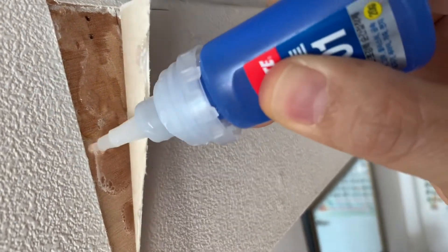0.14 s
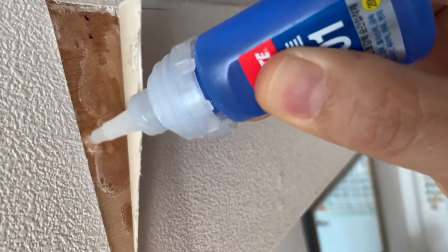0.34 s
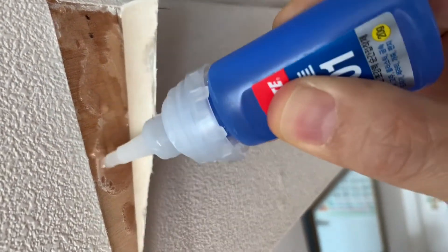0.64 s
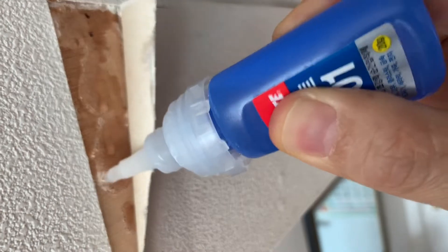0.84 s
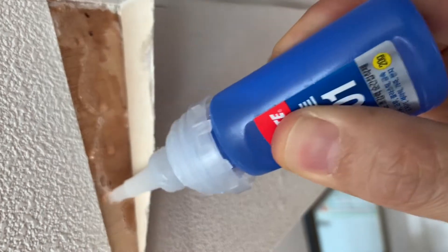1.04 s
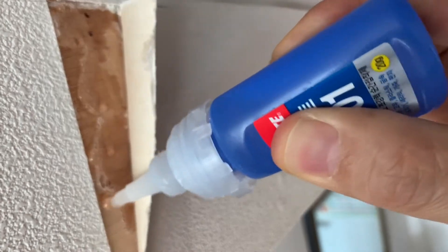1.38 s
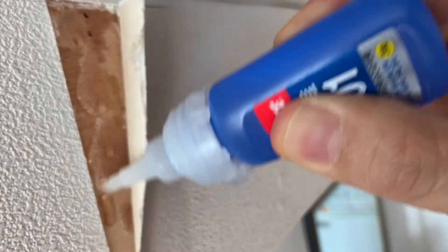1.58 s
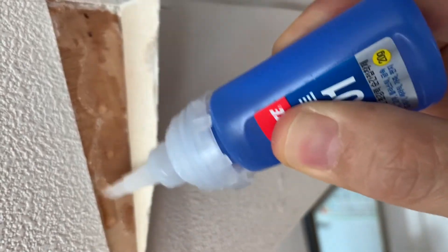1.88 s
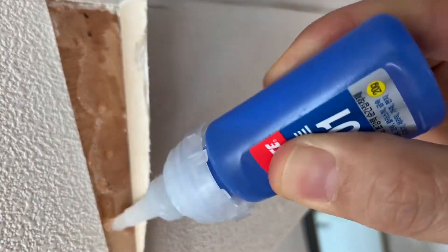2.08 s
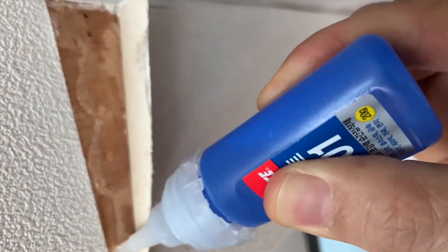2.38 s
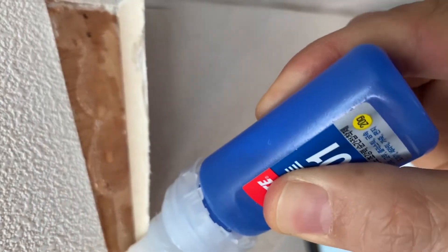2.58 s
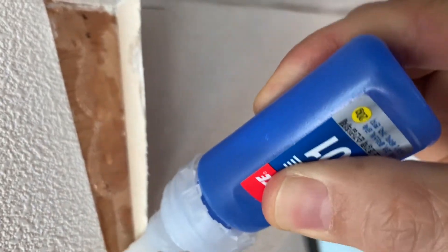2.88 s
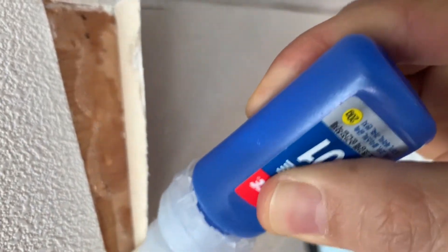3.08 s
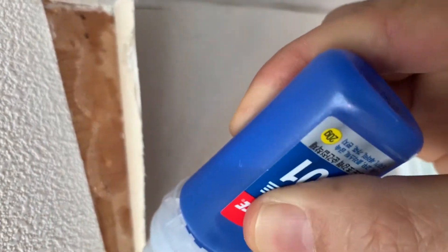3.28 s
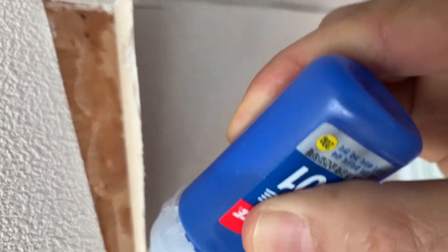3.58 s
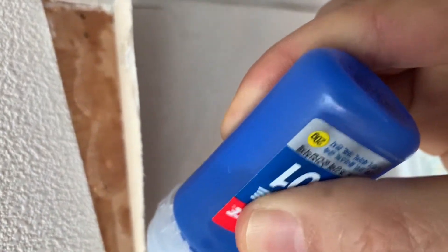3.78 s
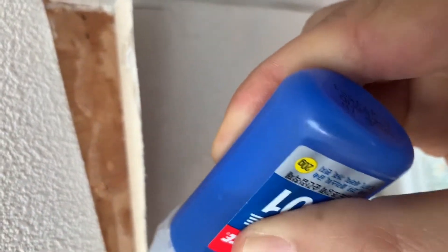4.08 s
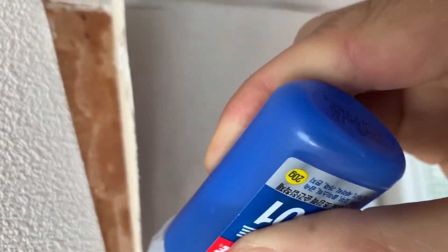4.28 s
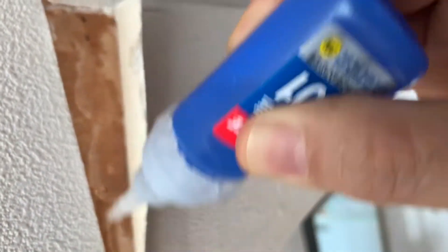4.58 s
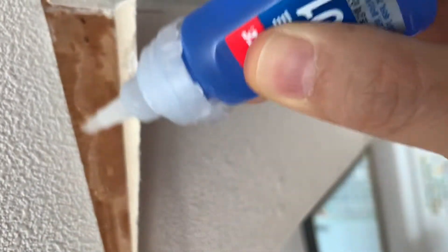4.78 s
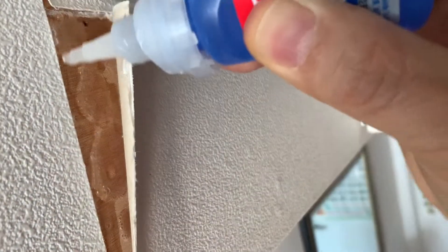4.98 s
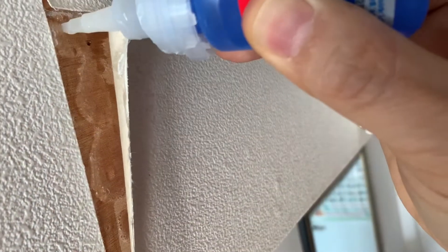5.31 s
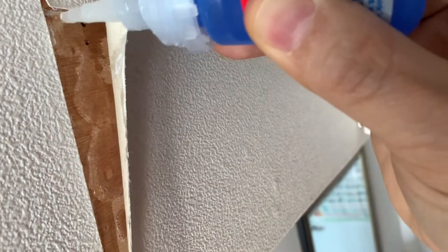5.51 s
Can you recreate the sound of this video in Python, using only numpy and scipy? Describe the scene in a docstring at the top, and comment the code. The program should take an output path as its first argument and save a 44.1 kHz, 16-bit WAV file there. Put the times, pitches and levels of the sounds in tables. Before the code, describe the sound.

A plastic glue bottle nozzle dabs along the edge of a papered wall panel, close to the microphone in a quiet room. For about four seconds it makes short, hissy scratches, many ending in a soft hollow knock, some with a brief judder or low rubbing hum. Then one longer, louder drag scrapes along the panel and brushes a loose paper edge. A few faint knocks follow, over a low handling rumble.

```python
"""A plastic glue nozzle works along the bare edge of a papered wall panel in a quiet room.
For four seconds it dabs in short, hissing strokes; about a third end in a knock, and some judder or hum.
Then comes one long drag back, which brushes a loose paper edge near 5 s, and last a few soft knocks.
Knocks and drag travel through the panel as bending waves, treble first, and reach the left microphone
first; the hiss travels through the air and reaches the right one first."""
import sys
import numpy as np
from scipy import signal
from scipy.fft import rfft, irfft, next_fast_len
from scipy.io import wavfile

SR = 44100
rng = np.random.default_rng(int(sys.argv[2]) if len(sys.argv) > 2 else 0)


def materialize(psi):
    """Save the field psi as 16-bit PCM at rate SR to the path in sys.argv[1].

    A 1-D psi becomes a single channel; in a 2-D psi each row is a channel.
    """
    bounded = np.clip(np.atleast_2d(psi).T, -1, 1)
    quanta = np.round(bounded * 32767).astype(np.int16)
    wavfile.write(sys.argv[1], SR, quanta)


N = 249165
TIME = np.arange(N) / SR
FFT_SIZE = next_fast_len(N + SR // 2)
HZ = np.maximum(np.arange(FFT_SIZE // 2 + 1) * SR / FFT_SIZE, 1)


def amp(db):
    """Turn decibels into a gain."""
    return 10 ** (np.asarray(db) / 20)

def unit_power(x):
    """Scale a sound to an average power of one."""
    return x / np.sqrt(np.mean(x ** 2) + 1e-20)

def through(x, response):
    """Filter a sound: each frequency gets its own gain and delay."""
    return irfft(rfft(x, FFT_SIZE) * response, FFT_SIZE)[..., :N]

def colour(points):
    """Join (Hz, dB) points into a gain for every frequency."""
    hz, db = np.transpose(points)
    return amp(np.interp(np.log(HZ), np.log(hz), db))

def delay(seconds):
    """A filter that makes a sound arrive later."""
    return np.exp(-2j * np.pi * HZ * seconds)

def gain_curves(rows):
    """Join rows of a time and several dB levels into gains over time, silent outside the rows."""
    times, *columns = np.transpose(rows)
    return [amp(np.interp(TIME, times, db, left=-200, right=-200)) for db in columns]

def envelope(starts, lengths, levels_db, rises_db, fade_db_per_s=1800, tail_db=-16, tail_db_per_s=400):
    """Each touch holds a sloping level, fades fast on either side and leaves a faint tail."""
    out = np.zeros(N)
    for start, length, db, rise_db in zip(starts, lengths, levels_db, rises_db):
        near = slice(max(int(start * SR) - 2000, 0), int((start + length) * SR) + 5000)
        since = TIME[near] - start
        inside = np.clip(since, 0, length)
        held = amp(db + rise_db * (inside / length - .5))
        fade = amp(-fade_db_per_s * abs(since - inside))
        tail = (since > length) * amp(tail_db - tail_db_per_s * (since - inside))
        out[near] = np.maximum(out[near], held * np.maximum(fade, tail))
    return out

def flicker(hz, depth_db):
    """A random gain that wanders up and down, at most about hz times a second."""
    points = rng.standard_normal(1000)
    return amp(depth_db * np.interp(TIME * 2 * hz, np.arange(len(points)), points))

def grit(per_s, spread_db):
    """The tip catches on grains of uneven size at random moments."""
    sizes = amp(spread_db * np.minimum(rng.exponential(1, N), 5)) * rng.standard_normal(N)
    return unit_power(sizes * (rng.random(N) < per_s / SR))

def clicks(times, db):
    """One sharp push at each given time."""
    out = np.zeros(N)
    np.add.at(out, (times * SR).astype(int), amp(db))
    return out

def ring(force, tones):
    """A push sets an object's own tones ringing; each dies away by 60 dB over its ring time."""
    out = 0
    for hz, db, ring_s in tones:
        decay, turn = amp(-60 / (ring_s * SR)), 2 * np.pi * hz / SR
        feedback = [1, -2 * decay * np.cos(turn), decay * decay]
        out = out + signal.lfilter([0, amp(db) * np.sin(turn)], feedback, force + 1e-18)
    return out


# The tone of the room's air. Each row: frequency in Hz, relative level in dB.
ROOM_COLOUR = [(18, -20), (38, 16.5), (112, 0.5), (554, -16), (7470, -38.5), (8520, -27), (16000, -47)]

def room(level_db=-61.5):
    """Faint, steady air, different on each side."""
    return amp(level_db) * unit_power(through(rng.standard_normal((2, N)), colour(ROOM_COLOUR)))


# How hard the hand leans. Each row: time in seconds, level in dB.
LEAN_LEVELS = [(0, -46), (1.3, -42.5), (2.0, -48.5), (3.1, -47), (4.15, -51), (4.85, -36), (5.12, -52.5),
               (5.3, -61.5), (5.45, -41.5), (5.64, -53)]
# The tone of its rumble. Each row: frequency in Hz, relative level in dB.
RUMBLE_COLOUR = [(25, -48), (45, 10), (80, 10.5), (160, 1), (600, -12), (2000, -63)]

def leaning_hand():
    """The hand leans on bottle and panel and makes a lumpy, low rumble."""
    times, db = np.transpose(LEAN_LEVELS)
    lumps = through(rng.standard_normal(N) * flicker(17, depth_db=4), colour(RUMBLE_COLOUR))
    return amp(np.interp(TIME, times, db)) * unit_power(lumps)


# The tip brushes loose paper. Each row: start in seconds, length in seconds, level in dB, rise in dB.
EDGE_BRUSHES = [(4.915, 0.176, -63, -6)]
# That paper's tones. Each row: pitch in Hz, relative level in dB, ring time in seconds.
LOOSE_EDGE_TONES = [(3700, 5, 0.011), (4030, 12, 0.011)]

def loose_edge():
    """A loose paper edge rings thinly as the tip slides back over it."""
    brushing = envelope(*np.transpose(EDGE_BRUSHES)) * flicker(24, depth_db=3)
    return brushing * unit_power(ring(grit(per_s=3400, spread_db=1.5), LOOSE_EDGE_TONES))


# The long drag back. Each row: time in seconds, then levels in dB for the hiss, the scrape,
# the panel's middle tones and its high tones.
DRAG_LEVELS = [(4.322, -71, -72, -53, -56), (4.344, -56, -56.5, -39, -52),
               (4.394, -49.5, -47.5, -40.5, -42.5), (4.416, -48.5, -55.5, -55, -57),
               (4.452, -53.5, -52.5, -30, -42.5), (4.546, -49, -47, -28, -29.5),
               (4.588, -55, -51.5, -46, -50), (4.648, -55, -49.5, -29, -33),
               (4.688, -56.5, -45, -27, -34.5), (4.732, -70.5, -62, -49, -75),
               (4.774, -54.5, -44, -37.5, -52), (4.828, -80, -59, -38, -48), (4.854, -58, -49, -27.5, -41),
               (4.874, -65, -56.5, -64, -66),         (5.084, -66.5, -58.5, -74, -60.5),
               (5.13, -105, -71, -69, -71)]

def long_drag(part):
    """How strongly the long drag drives one part of the sound over time."""
    return dict(zip(("hiss", "scrape", "middle", "high"), gain_curves(DRAG_LEVELS)))[part]


# Brief hums. Each row: start in seconds, level in dB, halfway pitch in Hz, length in seconds,
# whole fall in pitch as a share of the halfway pitch.
SLIP_HUMS = [(1.609, -37, 217, 0.02, 0.12), (2.248, -27, 275.5, 0.037, 0.076),
             (3.098, -26, 166, 0.031, 0.11), (3.227, -34.5, 159, 0.027, 0.11),
             (3.444, -28, 224.5, 0.031, 0.58), (3.787, -28, 233.7, 0.049, 1),
             (4.212, -35.5, 217, 0.04, 0.81)]

def hums():
    """The tip's slips fall into step and make a short tone that sags as the tip slows."""
    out = np.zeros(N)
    for start, db, hz, length, sag in SLIP_HUMS:
        t = np.arange(int(length * SR)) / SR
        cycles = hz * (t + sag * (t / 2 - t ** 2 / (2 * length)))
        swell = np.sqrt(np.sin(np.pi * t / length))
        out[int(start * SR):][:len(t)] += amp(db) * swell * np.sin(2 * np.pi * cycles)
    return out


# The tip judders under pressure. Each row: start in seconds, length in seconds,
# level in dB of the panel's middle tones, level in dB of its high tones.
TIP_JUDDERS = [(2.257, 0.022, -36, -39.5), (2.91, 0.041, -38.5, -50.5), (3.112, 0.013, -29, -37.5),
               (3.441, 0.049, -33, -44.5), (3.789, 0.043, -34, -43), (4.212, 0.027, -45, -57.5),
               (5.46, 0.077, -67.5, -59)]

def judder(fall_db=9.5):
    """Uneven sticking and slipping shakes the panel, in short bursts and during the long drag."""
    start, length, middle_db, high_db = np.transpose(TIP_JUDDERS)
    slips, out = grit(per_s=1100, spread_db=1.03), 0
    groups = [("middle", MIDDLE_TONES, middle_db, 0.26 * length),   # the heavier tones join later
              ("high", HIGH_TONES, high_db, 0)]
    for part, tones, db, lag in groups:
        force = envelope(start + lag, length - lag, db, np.full(len(db), -fall_db)) + long_drag(part)
        out = out + ring(force * slips, tones) / ring(slips, tones).std()
    cut_bass = signal.butter(3, 200, "high", fs=SR, output="sos")
    return signal.sosfilt(cut_bass, out)   # quick slips do not move the whole panel


# Grit snapping. Each row: time in seconds, level in dB before filtering, centre frequency in Hz.
GRIT_SNAPS = [(0.82, -33, 9000), (1.2185, -27, 15000), (1.8642, -30, 9000), (2.7505, -28, 5500),
              (3.1938, -20, 5500), (4.6158, -22, 8500), (4.6825, -23, 3600), (4.77, -23, 3300),
              (5.2505, -42, 2800), (5.3205, -36, 1500)]

def snaps(width=1.68):
    """Each snap is one click, narrowed to a band around its own centre."""
    out, click = np.zeros(N), np.arange(441) == 0
    for start, db, hz in GRIT_SNAPS:
        band = signal.butter(3, [hz / width, min(hz * width, .45 * SR)], "band", fs=SR, output="sos")
        out[int(start * SR):][:len(click)] += amp(db) * signal.sosfilt(band, click)
    return out


# Slow changes along the edge. Each row: time in seconds, scrape level in dB for a usual stroke,
# level in dB of the sheen (the very top of the hiss) against the rest of the hiss.
TONE_DRIFT = [(0, -49.5, 20), (.3, -42.5, 21), (.55, -51, 16), (1.05, -49, -6), (1.5, -52.5, -9),
              (1.68, -42.5, 10), (1.95, -56, -24.5), (2.3, -51, 12), (2.7, -59.5, -6), (3.1, -56.5, 4),
              (4.1, -62.5, 2.5), (4.7, -32.5, 15), (5.3, -45.5, -4)]

def drift(times):
    """The tone drifts as the tip works along: gives scrape dB and sheen dB at these times."""
    when, *columns = np.transpose(TONE_DRIFT)
    return [np.interp(times, when, db) for db in columns]


# The tip's short strokes. Each row: start in seconds, length in seconds, hiss level in dB.
TIP_STROKES = [(0.031, 0.034, -70.5), (0.084, 0.02, -61.5), (0.191, 0.046, -82.5), (0.256, 0.021, -75),
               (0.328, 0.077, -83), (0.412, 0.024, -59), (0.503, 0.073, -67), (0.576, 0.025, -53.5),
               (0.681, 0.053, -62.5), (0.75, 0.017, -51), (0.82, 0.082, -70.5), (0.931, 0.018, -45),
               (1.003, 0.042, -59.5), (1.092, 0.02, -44.5), (1.152, 0.042, -54), (1.237, 0.025, -46.5),
               (1.32, 0.081, -62.5), (1.385, 0.029, -44.5), (1.487, 0.077, -53), (1.613, 0.017, -67.5),
               (1.693, 0.009, -72), (1.719, 0.029, -77.5), (1.797, 0.017, -68), (1.865, 0.027, -60.5),
               (1.885, 0.087, -72), (1.984, 0.061, -61.5), (2.095, 0.034, -56), (2.165, 0.055, -72),
               (2.246, 0.031, -64.5), (2.363, 0.028, -83.5), (2.41, 0.029, -58.5), (2.493, 0.028, -81),
               (2.583, 0.0036, -66), (2.631, 0.044, -66), (2.723, 0.026, -53), (2.815, 0.046, -66),
               (2.907, 0.05, -62.5), (3.001, 0.028, -75), (3.07, 0.046, -50.5), (3.173, 0.033, -68.5),
               (3.236, 0.0044, -64), (3.439, 0.049, -54), (3.533, 0.048, -66.5), (3.717, 0.011, -75.5),
               (3.767, 0.048, -54), (4.041, 0.012, -55), (4.165, 0.078, -64), (5.457, 0.051, -76.5),
               (5.48, 0.091, -92)]
USUAL_HISS_DB = -60

def strokes(near_s=.013, swell_db=10, sink_db=-9.5):
    """Give each stroke a slope: it swells into a knock, sinks when leaving one, or else stays even."""
    start, length, hiss_db = np.transpose(TIP_STROKES)
    knock_times = np.transpose(PANEL_KNOCKS)[0][:, None]
    leaves, meets = (abs(knock_times - s).min(axis=0) < near_s for s in (start, start + length))
    sinks = leaves & ((length < 2 * near_s) | ~meets)
    rise_db = np.select([sinks, meets], [sink_db, swell_db], 0)
    return start, length, hiss_db, rise_db


# Hollows under the paper. Each row: pitch in Hz, relative level in dB, ring time in seconds.
HOLLOW_TONES = [(926, 2.5, 0.0066), (2390, 1.5, 0.008), (4240, 4.5, 0.011)]
# The tone of the scrape. Each row: frequency in Hz, relative level in dB.
SCRAPE_COLOUR = [(450, -9), (1100, 4.5), (1650, -10), (2200, -6), (3050, -9.5), (4200, -7), (5200, -10.5),
                 (9000, -23)]
# Its changing balance. Each row: time in seconds, gain in dB for the lows, gain in dB for the highs.
SCRAPE_BALANCE = [(0, -10, -2.5), (.9, -4.5, -4), (1.5, -7.5, -6), (2.1, 3.5, -5.5), (3.1, 7, -1.5),
                  (4.3, 1, 0), (5.6, -7, 1.5)]

def paper_rustle(lows_below_hz=1600, highs_above_hz=3000):
    """Grains rustle, and each hollow under the paper rings at three nearby pitches that come and go."""
    grains = grit(per_s=2600, spread_db=0.1)
    hollows = sum(flicker(12, depth_db=5) * ring(grains, [(hz * shift, db, ring_s)])
                  for hz, db, ring_s in HOLLOW_TONES for shift in (.91, 1, 1.09))
    rustle = unit_power(through(grains + amp(-8) * unit_power(hollows), colour(SCRAPE_COLOUR)))
    lows = through(rustle, 1 / (1 + (HZ / lows_below_hz) ** 8))
    highs = through(rustle, 1 / (1 + (highs_above_hz / HZ) ** 8))
    low_gain, high_gain = gain_curves(SCRAPE_BALANCE)
    return rustle + (low_gain - 1) * lows + (high_gain - 1) * highs

def scrape(alike=0.22, right_delay_s=.00027):
    """Coarse grains sound through the paper, nearer the left and only partly alike on both sides."""
    start, length, hiss_db, rise_db = strokes()
    scrape_db = drift(start)[0] + 0.61 * (hiss_db - USUAL_HISS_DB)   # partly follows the hiss
    left, other = paper_rustle(), paper_rustle()
    right = alike * through(left, delay(right_delay_s)) + np.sqrt(1 - alike ** 2) * other
    level = envelope(start, length, scrape_db, 0.66 * rise_db, fade_db_per_s=1305, tail_db=-5.5)
    level = (level + long_drag("scrape")) * flicker(60, depth_db=2)   # sticking and slipping
    return level * np.array([amp(2.5) * left, amp(-2) * right])


# The tone of the hiss and of its sheen. Each row: frequency in Hz, relative level in dB.
HISS_COLOUR = [(4000, -23), (6800, -5.5), (8500, -1.5), (10300, -4.5), (11500, -11), (13000, -41)]
SHEEN_COLOUR = [(11500, -25), (12500, 5), (14500, -13), (16000, 9.5)]

def hiss(scattered_db=-11, crackle_db=-15, left_delay_s=1 / 4680):
    """Fine rubbing noise and snaps come straight through the air; a little hiss arrives scattered."""
    level = envelope(*strokes()) + long_drag("hiss")
    rubbing = np.array([grit(per_s=15000, spread_db=2.5), amp(scattered_db) * rng.standard_normal(N)])
    main = through(rubbing, unit_power(colour(HISS_COLOUR)))
    sheen = through(rubbing, unit_power(colour(SHEEN_COLOUR)))
    brightening = (level / amp(USUAL_HISS_DB)) ** 0.15   # louder strokes get extra sheen
    sheen *= amp(drift(TIME)[1]) * brightening * flicker(45, depth_db=2.5)
    direct, scattered = level * (main * flicker(33, depth_db=1) + sheen)
    crackle = amp(crackle_db) * level * grit(per_s=90, spread_db=1.5)
    tone = colour(HISS_COLOUR) + amp(-38) * colour(SHEEN_COLOUR) + amp(-28) * colour(SCRAPE_COLOUR)
    from_tip = direct + snaps() + through(crackle, tone / tone.mean())
    return through(from_tip, np.array([delay(left_delay_s), delay(0)])) + scattered * [[1], [-1]]


# The panel's own tones: a low boom, a middle body and a high rap.
# Each row: pitch in Hz, relative level in dB, ring time in seconds.
LOW_TONES = [(61.3, -7.5, 0.53), (85.2, 3, 0.11), (148, 9.5, 0.021)]
MIDDLE_TONES = [(326, -7, 0.041), (413.2, 7.5, 0.02)]
HIGH_TONES = [(616, 0, 0.031), (932, -6, 0.03), (1207, -7.5, 0.031), (1357, -8.5, 0.021)]
# Knocks of the tip. Each row: start in seconds, level in dB, extra dB for the rap, extra dB for the boom.
PANEL_KNOCKS = [(0.105, -27.5, -4.5, -6), (0.19, -37, -4.5, -2.5), (0.27, -21.5, -8, -7),
                (0.437, -19, -6.5, -15), (0.506, -39.5, 7, 7), (0.6036, -14, -11, -8),
                (0.661, -30, -11.5, -5), (0.7674, -14.5, -8, -10), (0.819, -35, -9, 0.5),
                (0.954, -15.5, -6, -6), (1.119, -20, -10.5, -5), (1.268, -18, -14, -5.5),
                (1.414, -18, -9.5, -7), (1.805, -26.5, -8.5, -5.5), (1.862, -30, -1, -2),
                (2.127, -29, -3, -3), (2.268, -32, -10, 3.5), (2.435, -24, -3.5, 0.5), (2.748, -24, -5, -5),
                (2.911, -23.5, -10.5, 1), (3.106, -31, 6.5, 2.5), (3.193, -31, -0.5, -5),
                (3.613, -37.5, -23, -1.5), (3.827, -33, -6, -1.5), (4.745, -24.5, -10.5, -6.5),
                (4.769, -26, -2.5, -12), (4.843, -28.5, -10, -18), (5.33, -34.5, -18.5, -13),
                (5.427, -36, -54, -1), (5.566, -30, -56, -18)]

def knocks(body_db=-1, rap_shift=.03, blunt_below_db=-13.5):
    """Each knock rings the panel's three groups of tones; the lower ones feel a softer push."""
    start, db, rap_db, boom_db = np.transpose(PANEL_KNOCKS)
    chance_db = 3.5 * rng.standard_normal((len(start), len(HIGH_TONES)))
    low_push = clicks(start, db + boom_db)
    # The low tones start in alternate directions.
    boom = -sum((-1) ** k * ring(low_push, [tone]) for k, tone in enumerate(LOW_TONES))
    spots = rng.integers(-1, 2, len(start))   # where the tip lands bends the rap up or down
    rap = 0
    for (hz, tone_db, ring_s), luck_db in zip(HIGH_TONES, chance_db.T):
        for spot in (-1, 0, 1):
            push = clicks(start[spots == spot], (db + rap_db + luck_db)[spots == spot])
            rap = rap + ring(push, [(hz * (1 + spot * rap_shift), tone_db, ring_s)])
    # A knock with little rap lands bluntly, so more of its body is muffled.
    body = ring(clicks(start, db + body_db), MIDDLE_TONES)
    sharp = ring(clicks(start, db + body_db + np.minimum(rap_db - blunt_below_db, 0)), MIDDLE_TONES)
    blunt = signal.sosfilt(signal.butter(4, 660, fs=SR, output="sos"), body - sharp)
    soften = signal.butter(2, 800, fs=SR, output="sos")
    return signal.sosfilt(soften, sharp + blunt + boom) + rap


# The tone of a blunt tip on a small panel. Each row: frequency in Hz, gain in dB.
CONTACT_COLOUR = [(20, -34), (55, -10.5), (90, -3.5), (1300, 2.5), (1800, -34.5)]
# The panel as heard on the right. Each row: frequency in Hz, dB against the left, lag in radians.
RIGHT_SIDE = [(40, -2, 0.1), (183, 1, 0.53), (419, -4, 1.49), (695, -10, 2), (923, -0.5, 0.5),
              (1300, -7.5, 2.5), (1800, 0, 0.5)]

def panel(shaking, delay_at_1_hz_s=.06, strongest_echo_s=0.031):
    """High bending waves run faster, so treble arrives first; the edges send back dull, thin echoes."""
    echo_s = np.linspace(.016, .075, 14) + rng.uniform(-.002, .002, 14)
    echo_db = -18 - 296 * abs(echo_s - strongest_echo_s)
    gains = rng.choice([-1, 1], len(echo_s)) * amp(echo_db)
    echoes = sum(gain * delay(s) for s, gain in zip(echo_s, gains))
    echoes = echoes / (1 + (160 / HZ) ** 4) / (1 + (HZ / 840) ** 4)   # mostly 160 to 840 Hz comes back
    travel = np.exp(-4j * np.pi * delay_at_1_hz_s * np.sqrt(HZ))   # speed grows with the root of pitch
    left = colour(CONTACT_COLOUR) * travel * (1 + echoes)
    hz, db, radians = np.transpose(RIGHT_SIDE)
    lag = np.interp(np.log(HZ), np.log(hz), radians)
    right = left * colour(np.transpose([hz, db])) * np.exp(-1j * lag)
    return through(shaking, np.array([left, right]))


def scene():
    """The panel, the sounds of rubbing and the room add up at two microphones."""
    shaking = knocks() + judder() + hums() + leaning_hand()
    return panel(shaking) + hiss() + scrape() + loose_edge() + room()

def record(dry):
    """Cut away the highest treble, leaving almost nothing above 16450 Hz."""
    return signal.sosfilt(signal.cheby2(12, 70, 16450, fs=SR, output="sos"), dry)


dry = scene()
out = record(dry)
materialize(out)
```